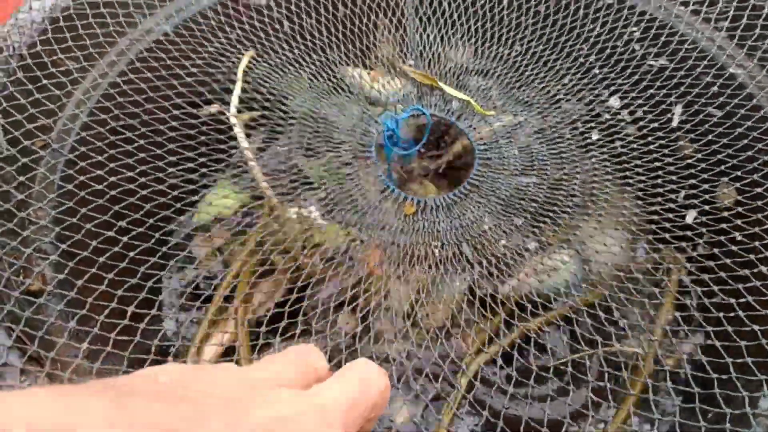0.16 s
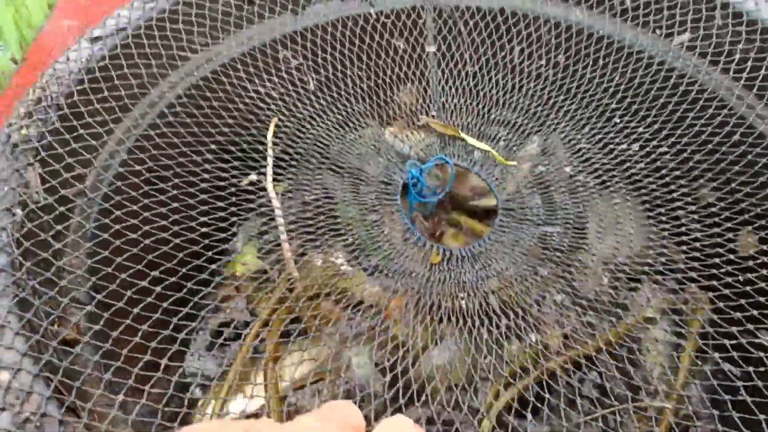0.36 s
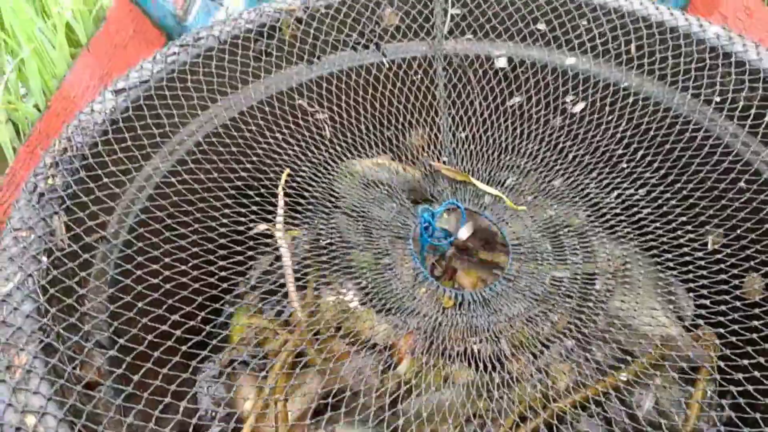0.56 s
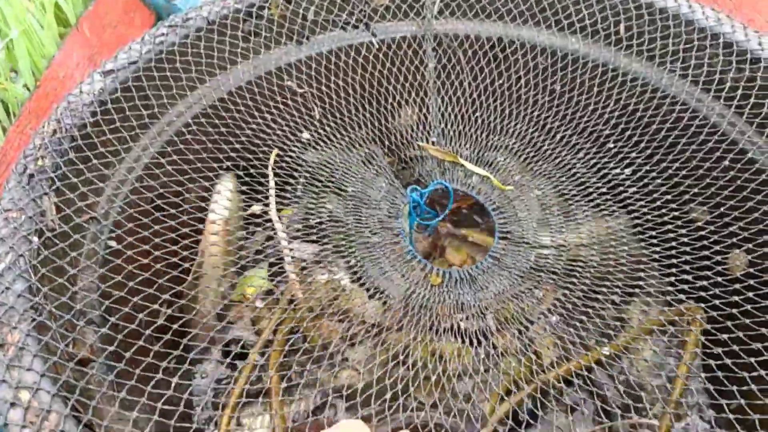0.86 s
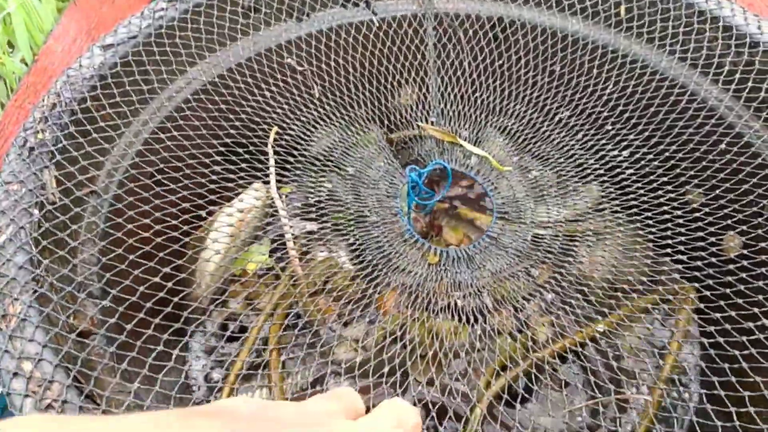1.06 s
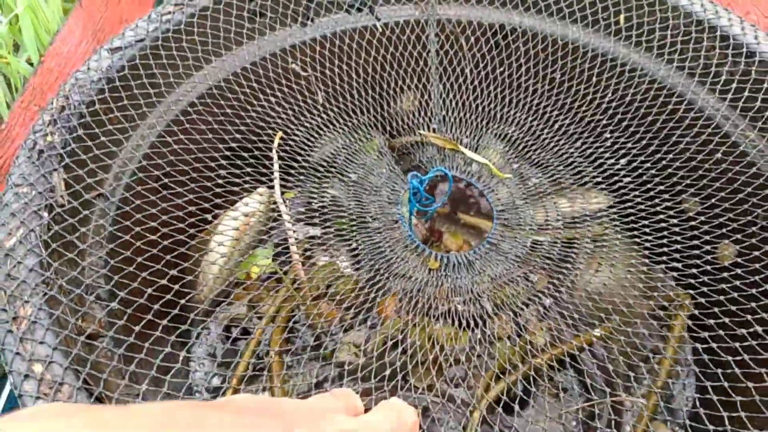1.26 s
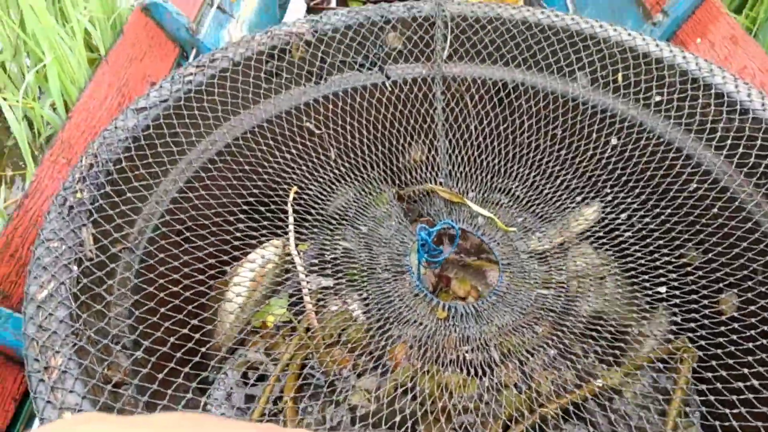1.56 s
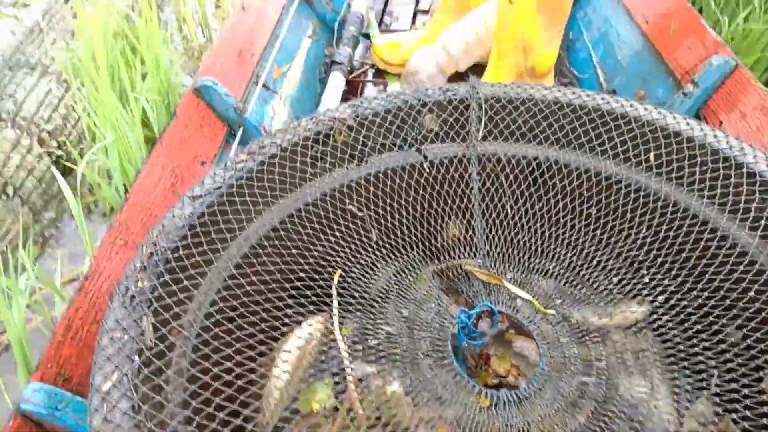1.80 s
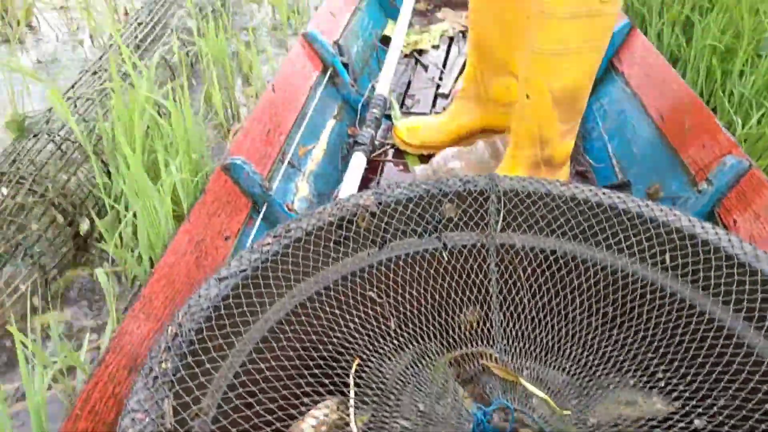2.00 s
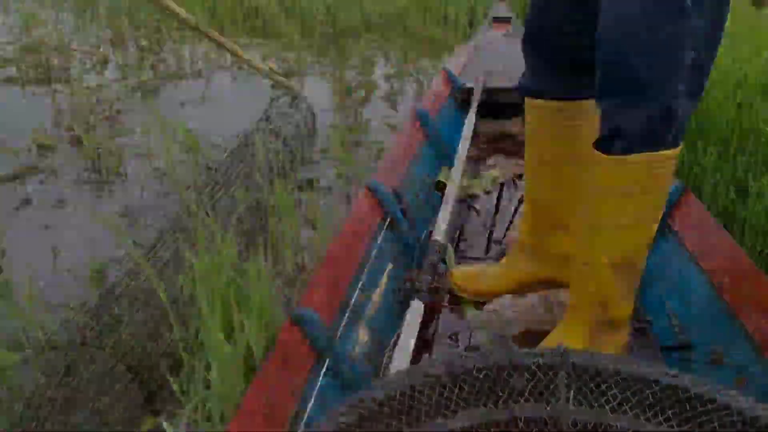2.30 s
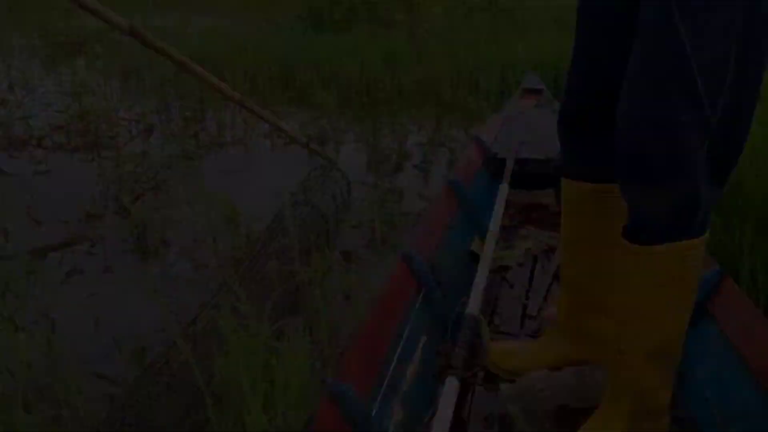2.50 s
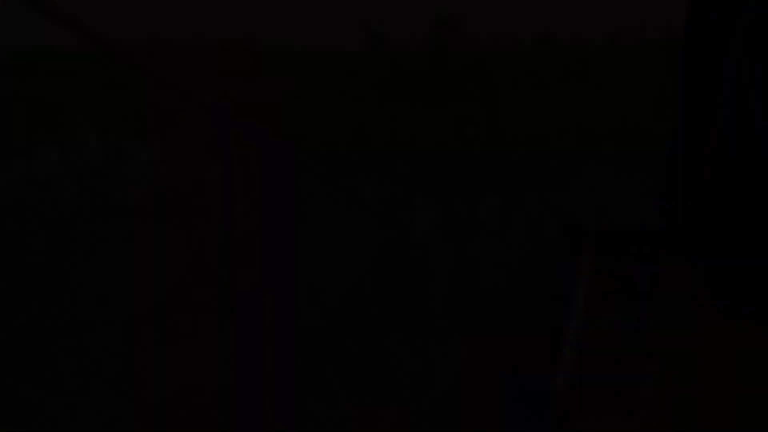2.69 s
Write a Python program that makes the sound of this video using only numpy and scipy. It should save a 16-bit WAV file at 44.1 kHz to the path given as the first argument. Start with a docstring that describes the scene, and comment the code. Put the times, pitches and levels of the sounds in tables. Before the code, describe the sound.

Fish thrash in shallow water at the bottom of a tub, close up. Their tails slap, spray crackles on a mesh net and the water gulps. Two bouts of splashing each die down to drips, over faint outdoor air.

```python
"""Fish thrashing in a tub.

Live fish thrash in shallow water at the bottom of a tub, under a mesh net, on a small boat outdoors.
Tails slap and spatter, drops fall back and ring as bubbles, and the water gulps in the hollow of the tub.
Two bouts of thrashing each die down to dripping, over a faint bed of open air."""
import sys
import numpy as np
from scipy import signal
from scipy.fft import rfft, irfft
from scipy.io import wavfile
from scipy.ndimage import uniform_filter1d, map_coordinates

SR = 44100
rng = np.random.default_rng(int(sys.argv[2]) if len(sys.argv) > 2 else 0)


def materialize(psi):
    """Save the field psi as 16-bit PCM at rate SR to the path in sys.argv[1].

    A 1-D psi becomes a single channel; in a 2-D psi each row is a channel.
    """
    bounded = np.clip(np.atleast_2d(psi).T, -1, 1)
    quanta = np.round(bounded * 32767).astype(np.int16)
    wavfile.write(sys.argv[1], SR, quanta)


N = 125685
TOP_HZ = 7700  # highest pitch for slaps and their droplets


def undb(db):
    """Decibels to gain."""
    return 10 ** (np.asarray(db) / 20)


def unit(x):
    """Scale to rms 1."""
    return x / np.sqrt(np.mean(x ** 2) + 1e-20)


def add(out, start_s, x):
    """Mix x into out from a given time."""
    i = int(np.clip(start_s * SR, 0, N - 1))
    out[i:i + len(x)] += x[:N - i]


def eq(x, curve):
    """Minimum-phase EQ through (f/Hz, gain/dB) points: no ringing ahead of an attack."""
    size = 4096
    hz, db = np.array(curve, float).T
    f = np.maximum(np.arange(size // 2 + 1) * SR / size, 1)
    gain = undb(np.interp(np.log(f), np.log(hz), db))
    cepstrum = irfft(np.log(gain))
    cepstrum[1:size // 2] *= 2
    cepstrum[size // 2 + 1:] = 0
    return signal.fftconvolve(x, irfft(np.exp(rfft(cepstrum))))[:len(x)]


def strike(t, rise_ms, decay_ms):
    """Percussive envelope: quick attack, exponential decay, peak 1."""
    ms = t * 1000
    env = (1 - np.exp(-(ms / rise_ms) ** 2)) * np.exp(-ms / decay_ms)
    return env / env.max()


def bubble(hz, cycles, rise_ms=.29, glide=.035):
    """A pocket of air rings and bends up as it nears the surface; glide is share of pitch per decay."""
    decay_s = max(cycles, 1) / hz
    t = np.arange(int(6 * decay_s * SR)) / SR
    phase = 2 * np.pi * hz * (t + glide * t ** 2 / (2 * decay_s))
    return strike(t, rise_ms, decay_s * 1000) * np.sin(phase)


def patter(per_s, spread_db):
    """Random tiny impacts: many weak ones and a few strong."""
    hits = rng.random(N) < per_s / SR
    polarity = np.sign(rng.standard_normal(N))
    return hits * polarity * undb(spread_db * np.minimum(rng.exponential(size=N), 3.5))


def wander(x, depth=.045, per_s=16):
    """All resonances drift up and down together as the water changes shape."""
    knots = rng.standard_normal(int(per_s * N / SR) + 2)
    speed = 1 + depth * np.interp(np.arange(N) * per_s / SR, np.arange(len(knots)), knots)
    return map_coordinates(x, [np.cumsum(speed)], mode="mirror")


def walls(x, near_ms=.8, far_ms=6.5):
    """Four early reflections off the tub wall, different for every spot; total energy stays the same."""
    lags_ms = near_ms + (far_ms - near_ms) * (np.arange(4) + rng.random(4)) / 4
    out = np.pad(x, (0, SR // 50))
    for ms in lags_ms:
        lag = int(ms * SR / 1000)
        out[lag:lag + len(x)] += .24 * x
    return out * np.linalg.norm(x) / np.linalg.norm(out)


# Tone of the outdoor bed: f/Hz, gain/dB
AIR_EQ = [(25, 9), (60, 1), (120, -4.5), (200, -9.5), (280, 8), (400, -32), (900, -43.5), (2000, -8.5),
          (4000, -36.5), (8000, -30.5)]

def air():
    """A faint bed of open-air rumble and hiss."""
    return undb(-57) * unit(eq(rng.standard_normal(N), AIR_EQ))


# Bright spray, hollow slosh and low handling rumble: f/Hz, gain/dB
SPRAY_EQ = [(400, -27), (900, 1), (1600, 3), (2400, 3.5), (3200, 6), (4100, 4.5), (5000, -8), (6300, 2),
            (7600, -4)]
SLOSH_EQ = [(60, -11.5), (150, -27.5), (220, -6.5), (285, 9), (400, -12), (600, -6), (830, 2.5), (1200, -7),
            (1700, 1.5), (3000, -36), (8000, -38)]
HANDLING_EQ = [(25, -1.5), (70, -5.5), (110, -5.5), (170, -4), (260, 0), (380, -13), (480, -13),
               (700, -30.5), (3000, -50)]
# Fader rides for the stirred water: t/s, spray level/dB, slosh level/dB
CHURN_RIDES = [(0, -26, -26), (.095, -37.5, -30.5), (0.119, -32, -38.5), (0.201, -45.5, -38.5),
               (0.269, -45.5, -45), (0.337, -59, -61.5), (0.391, -47, -42.5), (.47, -49, -40.5),
               (.525, -32, -34), (0.571, -43.5, -48.5), (0.647, -44.5, -46.5), (.715, -55, -50.5),
               (0.772, -42.5, -46), (0.823, -51.5, -56), (0.881, -52, -44), (.94, -59, -59.5),
               (1.041, -51.5, -46), (1.11, -61.5, -55.5), (1.179, -61, -63), (1.261, -54, -44),
               (1.305, -59, -57.5), (1.41, -49, -43), (1.449, -52.5, -50), (1.525, -61, -53.5),
               (1.59, -58.5, -51), (1.649, -45, -38), (1.713, -29, -43), (1.75, -43.5, -38),
               (1.82, -41, -37.5), (1.866, -44, -49.5), (1.98, -39.5, -37.5), (2.07, -51, -46),
               (2.14, -48, -48.5), (2.225, -45.5, -38), (2.305, -53, -47), (2.378, -59, -53),
               (2.439, -64.5, -68), (2.50, -68.5, -64.5), (2.573, -57.5, -48), (2.655, -68.5, -72),
               (2.715, -58.5, -50), (2.77, -76, -64.5), (2.85, -59, -51)]

def churn(bubbles_per_s=1200, low_hz=1050, high_hz=7400):
    """Spray crackles on the net and tiny bubbles pop; the water sloshes,
    and a low handling rumble swells and fades with it."""
    t = np.arange(N) / SR
    times, spray_db, slosh_db = np.array(CHURN_RIDES).T
    spray = undb(np.interp(t, times, spray_db))
    slosh = undb(np.interp(t, times, slosh_db))
    handling = undb(-32.5) * slosh ** .46  # follows the slosh with about half its swing in dB
    out = spray * unit(eq(patter(per_s=2600, spread_db=2), SPRAY_EQ))
    out += slosh * unit(wander(eq(patter(per_s=900, spread_db=5), SLOSH_EQ)))
    out += handling * unit(eq(rng.standard_normal(N), HANDLING_EQ))
    for when, pitch, strength, length in rng.random((int(bubbles_per_s * N / SR), 4)):
        hz = low_hz * (high_hz / low_hz) ** pitch
        gain = spray[int(when * N)] * undb(-7 + 12 * strength)
        add(out, when * N / SR, gain * bubble(hz, cycles=2.7 * (.5 + length)))
    return out


def mesh_ticks(per_s=280, centre_hz=4000, spread_octaves=.85):
    """Stray droplets ping off the wet mesh, mostly faint; they ride the spray fader up to a limit."""
    out = np.zeros(N)
    times, spray_db, _ = np.array(CHURN_RIDES).T
    for when, pitch, chance, length in rng.random((int(per_s * N / SR), 4)):
        start = when * N / SR
        hz = centre_hz * 2 ** (spread_octaves * (2 * pitch - 1))
        accent_db = 5 - 4.5 * np.log(max(chance, .07))
        ride_db = min(np.interp(start, times, spray_db), -51)
        ping = bubble(hz, cycles=2.6 * (.5 + length))
        add(out, start, undb(accent_db + ride_db) * walls(ping))
    return out


# Drops falling back into the water: t/s, f/Hz, level/dB before trim, decay/cycles (played as 1 or more)
DROP_HITS = [(.001, 875, -7, 1.5), (.038, 935, -10.5, 1.5), (.080, 1086, -13, 2.5), (.0925, 840, -7.5, 2.5),
             (.2822, 2520, -8, 2.5), (.284, 1546, -7.5, 2.5), (.284, 473, -25, 5.5),
             (.438, 1500, -17.5, 4.5), (.440, 834, -11.5, 1), (.4878, 3540, -10.5, 4.5),
             (.4882, 1560, -12, 5), (.537, 3150, -16.5, 7), (.758, 910, -26, 6.5), (.775, 2250, -16.5, 2.5),
             (.786, 1320, -12.5, 3.5), (1.001, 2410, -20, 2), (1.0035, 3000, -29, 5),
             (1.153, 1150, -26.5, 1), (1.155, 4000, -28.5, 5.5), (.595, 4060, -21, 12),
             (0.612, 1740, -24.5, 5), (0.196, 4060, -15, 5), (2.279, 3040, -15.5, 3),
             (1.214, 3270, -19, 2.5), (1.2903, 1005, -15.5, 1), (1.331, 3160, -13.5, 1.5),
             (1.3798, 1065, -13.5, 1.5), (1.4072, 3760, -10, 2.5), (1.419, 1500, -25, 6.5),
             (1.502, 1180, -21.5, 1.5), (1.582, 1280, -22, 1.5), (1.6341, 1440, -6, -1.5),
             (1.6383, 2030, -9.5, 2), (1.639, 1345, -10, 3), (1.811, 1804, -23.5, 4), (2.039, 864, -24, 0),
             (2.055, 760, -24.5, 2.5), (2.111, 2290, -20, 8), (2.114, 2264, -18.5, 6.5),
             (2.123, 2470, -22, 6), (2.241, 2370, -13.5, 5), (2.338, 1060, -21, 2), (2.365, 1940, -21, 7.5),
             (2.512, 2120, -25, 4.5), (2.533, 2075, -28, 3), (2.616, 2150, -24.5, 5.5),
             (2.829, 1090, -21, 2)]

def drops(trim_db=-3, splat_db=-19):
    """Each drop lands with a tiny splat, then rings as a bubble with its own pitch bend."""
    out, t = np.zeros(N), np.arange(SR // 50) / SR
    for start, hz, db, cycles in DROP_HITS:
        ring = bubble(hz, cycles, rise_ms=.41, glide=.07 * rng.random())
        flutter = unit(uniform_filter1d(rng.standard_normal(SR // 5), size=24))
        ring *= 1 + .22 * np.resize(flutter, len(ring))
        add(out, start, undb(db + trim_db) * walls(ring))
        hiss = unit(eq(rng.standard_normal(len(t)), SPRAY_EQ))
        splat = hiss * strike(t, rise_ms=.29, decay_ms=1.5)
        add(out, start, undb(db + trim_db + splat_db) * splat)
    return out


# Tone of a wet slap: f/Hz, gain/dB
SLAP_EQ = [(60, -15), (150, 15), (290, -15), (420, 7.5), (620, 5), (850, 2), (1500, 0.5), (2400, -1.5),
           (4100, -0.5), (5000, -4.5), (7500, 0.5)]
# Tail slaps and spatters: t/s, level/dB before trim, centre f/Hz, decay/ms
SLAP_HITS = [(0.012, -17.5, 2586, 7.6), (0.023, -18, 1490, 3.9), (0.034, -11.5, 4300, 4.9),
             (.038, -21, 1490, 4), (0.046, -21, 2980, 3.5), (0.0585, -14, 3570, 2.2),
             (0.07, -17.5, 3080, 6.6), (.086, -20, 3300, 5.9), (0.0906, -8.5, 3750, 3.7),
             (0.099, -23, 3470, 2.7), (0.121, -29, 3100, 3.1), (0.163, -25, 3560, 9.7),
             (.175, -25, 3300, 10.4), (0.189, -23.5, 3400, 7), (0.247, -31, 3400, 4.1),
             (0.2826, -15.5, 1745, 4.2), (0.289, -29.5, 1510, 9.5), (.298, -33.5, 520, 15),
             (.351, -31.5, 1170, 10.4), (0.387, -33, 2600, 5.6), (0.406, -21.5, 3570, 1.62),
             (0.436, -24, 1136, 5.9), (0.4865, -33, 2960, 1.8), (0.441, -22, 4150, 1.96),
             (0.503, -23.5, 4230, 13), (.515, -20.5, 2470, 7), (0.5362, -14, 3400, 5),
             (0.549, -29, 2780, 4.3), (0.592, -31, 4350, 2.3), (0.609, -26.5, 1770, 3.5),
             (.628, -22, 2860, 7.3), (0.668, -32.5, 2850, 6.5), (0.738, -32, 4030, 7.1),
             (.755, -29, 1050, 7), (0.774, -20, 3480, 5.15), (.839, -25.5, 3000, 5.5),
             (0.864, -30.5, 3900, 2.3), (.887, -20, 3100, 2.43), (.894, -33, 2580, 3.4),
             (0.979, -27.5, 1910, 6.2), (1.017, -21, 3400, 3.4), (1.046, -29.5, 2940, 4),
             (1.065, -36.5, 4500, 3.4), (1.085, -33, 3640, 3.9), (1.197, -30.5, 3050, 2.4),
             (1.213, -29, 3790, 3.1), (1.247, -36.5, 3500, 3.5), (1.259, -30.5, 3320, 5.1),
             (1.33, -26.5, 2500, 3.5), (1.35, -32, 2840, 4), (1.387, -23.5, 3520, 3.6),
             (1.401, -29, 3020, 15), (1.455, -22.5, 1930, 4.2), (1.545, -36, 5100, 3.9),
             (1.583, -33, 4850, 1.6), (1.599, -28.5, 1500, 6.8), (1.618, -31, 1240, 8.8),
             (1.6315, -16, 2180, 5.7), (1.67, -21, 1246, 9.6), (1.71, -14, 5440, 10.1),
             (1.724, -30, 5100, 2.6), (1.75, -31, 690, 14.5), (1.829, -32, 3700, 7.2),
             (1.924, -23.5, 3620, 2.8), (1.987, -20, 2510, 2.26), (2.013, -28.5, 2410, 6.7),
             (2.055, -24.5, 1264, 4), (2.083, -25.5, 1630, 3.5), (2.123, -33, 2700, 7),
             (2.17, -22.5, 2030, 5.4), (2.183, -23.5, 1940, 5.5), (2.202, -18, 2860, 4.7),
             (2.234, -22.5, 2300, 3), (2.241, -21, 2170, 3.6), (2.256, -20.5, 1870, 1.85),
             (2.278, -24.5, 3060, 4.9), (2.363, -25, 1990, 4.85), (2.366, -25, 4630, 3.25),
             (2.534, -34.5, 2360, 2.16), (2.577, -27, 2580, 2.2), (2.58, -27.5, 3300, 1.9),
             (2.616, -34.5, 2620, 5.6), (2.788, -38, 1410, 16.5), (2.839, -34.5, 1940, 13.7)]

def tail_slaps(trim_db=-3):
    """Each slap bursts into a short shower of clicks and ringing droplets."""
    out, t = np.zeros(N), np.arange(SR // 10) / SR
    for start, db, hz, decay_ms in SLAP_HITS:
        noise, grain = rng.standard_normal((2, len(t)))
        env = strike(t, rise_ms=1.2, decay_ms=decay_ms)
        b, a = signal.iirpeak(min(hz, TOP_HZ), Q=1.18, fs=SR)
        clicks = unit(signal.lfilter(b, a, env * noise * np.exp(.52 * grain)))
        droplets = undb(.5) * unit(spatter(hz, decay_ms, len(t)))
        burst = unit(eq(clicks + droplets, SLAP_EQ))
        env_rms = np.sqrt(np.mean(env ** 2))
        add(out, start, undb(db + trim_db) * env_rms * walls(burst))
    return out


def spatter(hz, decay_ms, size, spread_octaves=.652):
    """Twelve droplets thrown up by one slap, each at its own pitch; late ones tend to be softer."""
    out = np.zeros(N)
    delays, offsets, strengths = rng.exponential(size=12), rng.standard_normal(12), rng.random(12)
    for delay, offset, strength in zip(delays, offsets, strengths):
        pitch = np.clip(hz * 2 ** (spread_octaves * offset), 900, TOP_HZ)
        add(out, delay * decay_ms / 1000, strength * np.exp(-delay / 2) * bubble(pitch, cycles=3.5))
    return out[:size]


# Low gulps as a body shoves the water: t/s, f/Hz, level/dB before trim
GULP_HITS = [(0.064, 275, -35), (.175, 305, -31), (0.2818, 311, -23.5), (0.439, 281, -21.5),
             (0.52, 277, -26), (0.573, 278, -28.5), (0.658, 306, -30.5), (0.757, 273, -30.5),
             (0.841, 288, -37.5), (.885, 285, -36), (0.984, 280, -36), (1.058, 268, -36.5),
             (1.227, 300, -35.5), (1.455, 300, -27), (1.603, 252, -17), (1.621, 275, -21),
             (1.635, 350, -22), (1.655, 359, -27), (1.674, 290, -25.5), (1.693, 355, -28),
             (1.749, 298, -30.5), (1.984, 247, -28.5), (2.281, 278, -27.5), (2.367, 257, -30),
             (2.677, 276, -29)]

def gulps(trim_db=-1.5, decay_ms=7.4):
    """Shoved water rings the hollow of the tub for a few uneven cycles; the pitch drifts as it moves."""
    out, t = np.zeros(N), np.arange(SR // 8) / SR
    env = strike(t, rise_ms=2.8, decay_ms=decay_ms)
    for start, hz, db in GULP_HITS:
        wobble = unit(uniform_filter1d(rng.standard_normal(len(t)), size=150))
        drift = 1 + .04 * rng.standard_normal() * np.tanh(t * 1000 / decay_ms - 1)
        ring = (1 + .13 * wobble) * np.sin(2 * np.pi * np.cumsum(hz * drift) / SR)
        add(out, start, undb(db + trim_db) * env * ring)
    return out


def tub_reverb(x):
    """A tight ring inside the tub and a faint, longer scatter from the boat."""
    t = np.arange(SR // 3) / SR
    response = np.zeros(len(t))
    response[0] = 1
    for t60_s, send_db in ((.05, -13), (.22, -33.5)):  # tub, boat
        tail = rng.standard_normal(len(t)) * undb(-60 * t / t60_s) * (t > .002)
        response += undb(send_db) * tail / np.linalg.norm(tail)
    return signal.fftconvolve(x, response)[:N]


def scene():
    """Mono mix: all the thrashing goes through the tub reverb, over the open-air bed."""
    thrashing = churn() + tail_slaps() + drops() + mesh_ticks() + gulps()
    return (air() + tub_reverb(thrashing))[None]


def record(dry, ceiling=.62, cutoff_hz=7900):
    """Soft clipping rounds the loudest peaks, then a steep low-pass takes off the top."""
    rounded = ceiling * np.tanh(dry / ceiling)
    lowpass = signal.firwin(161, cutoff_hz, window=("kaiser", 9), fs=SR)
    return signal.fftconvolve(rounded, lowpass[None], mode="same")


dry = scene()
out = record(dry)
materialize(out)
```